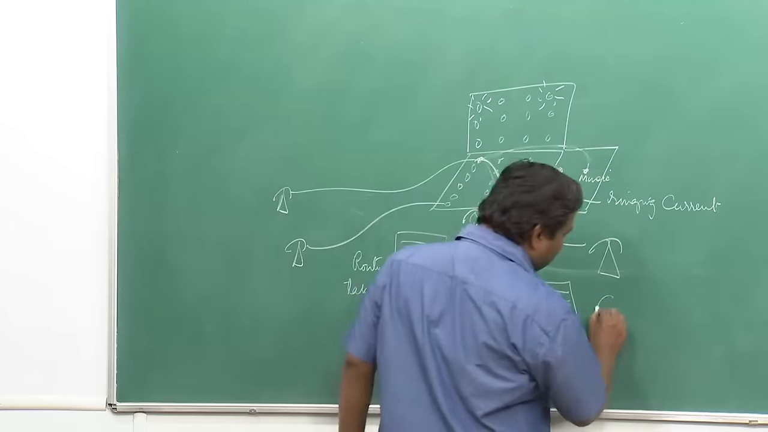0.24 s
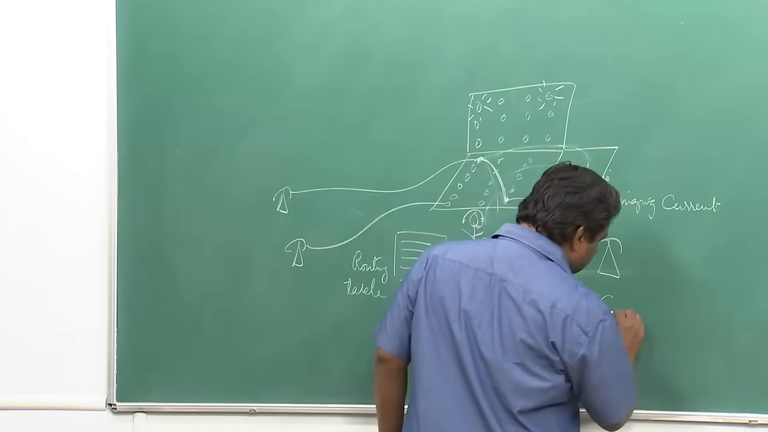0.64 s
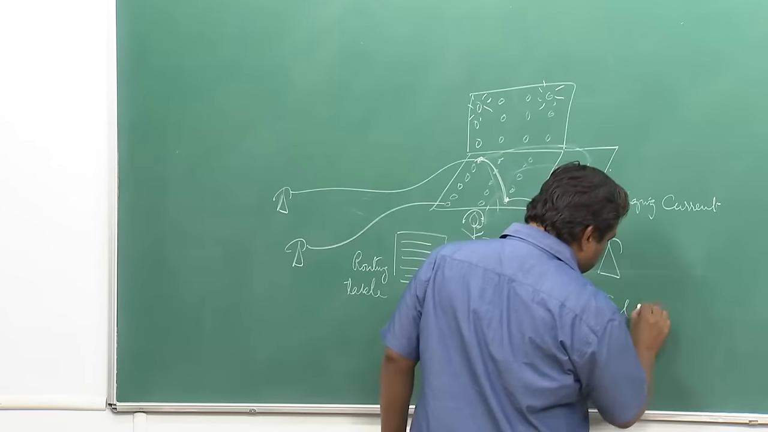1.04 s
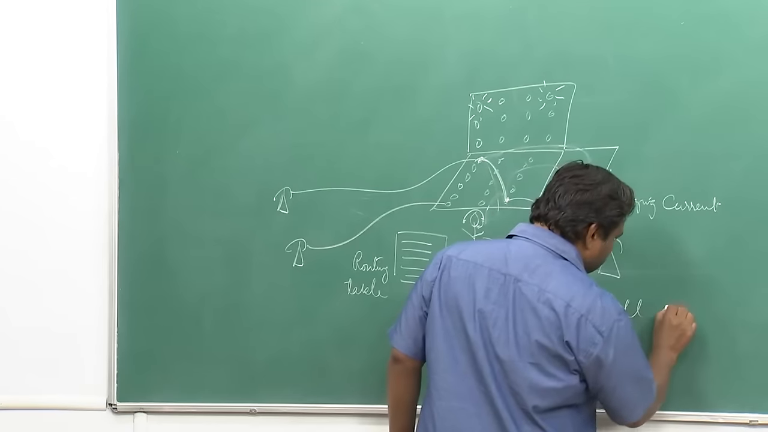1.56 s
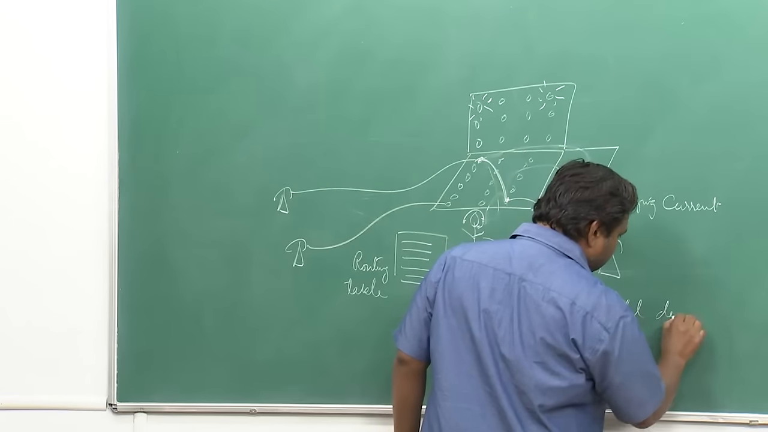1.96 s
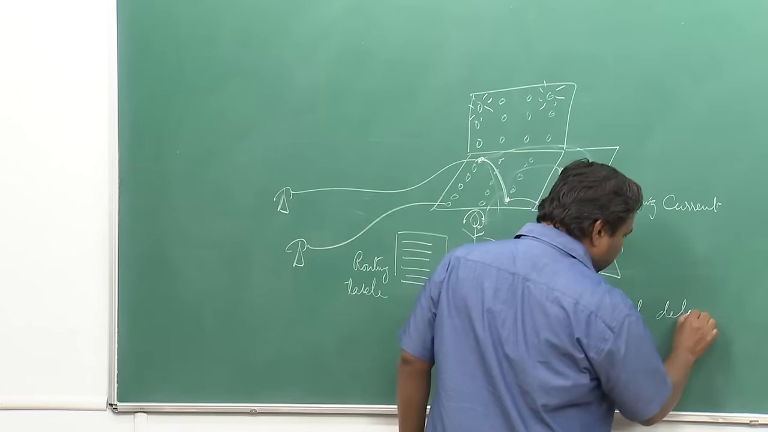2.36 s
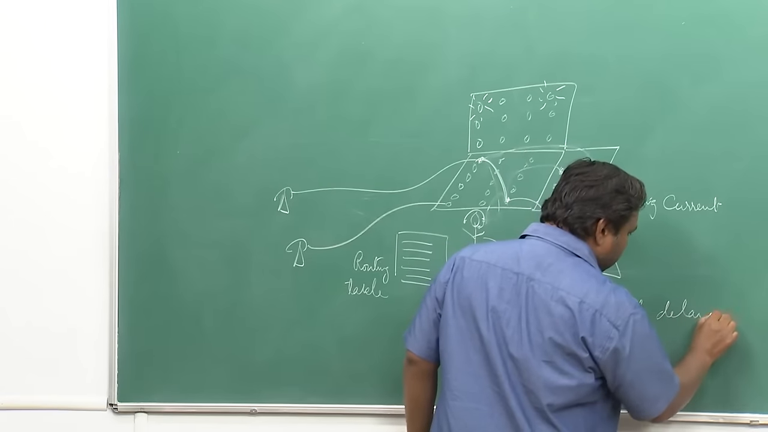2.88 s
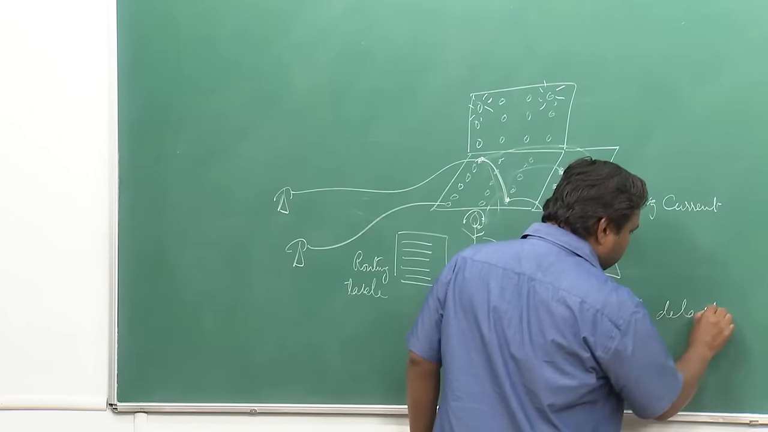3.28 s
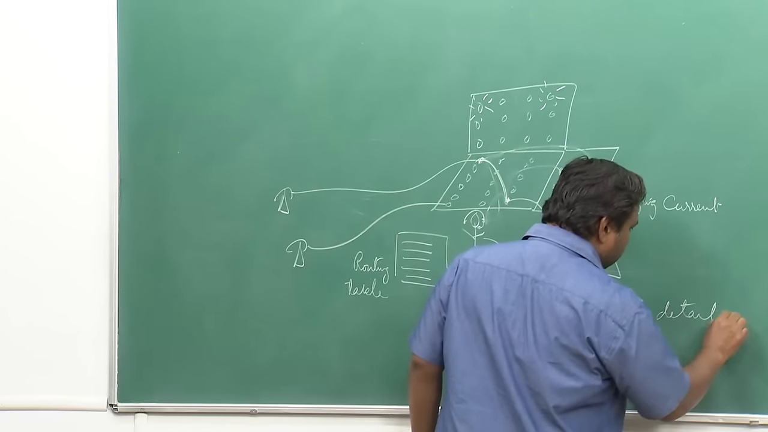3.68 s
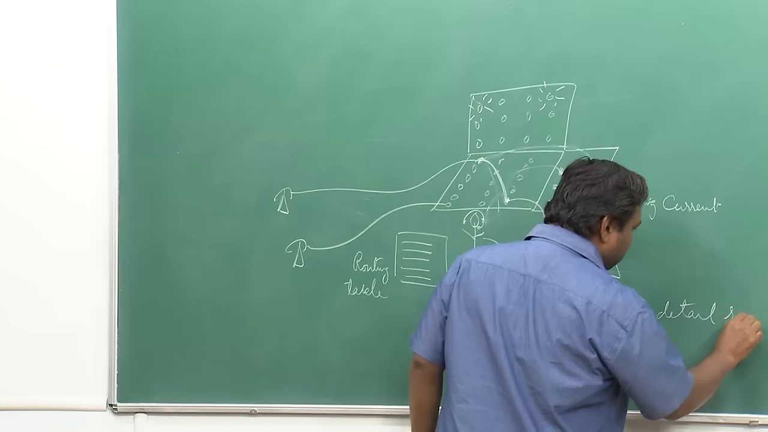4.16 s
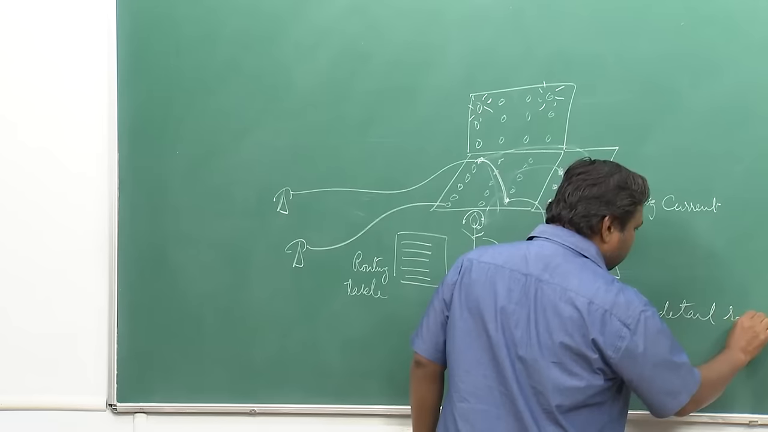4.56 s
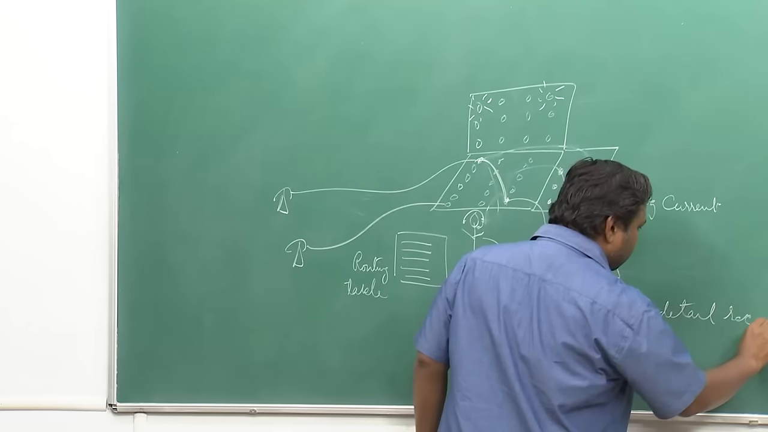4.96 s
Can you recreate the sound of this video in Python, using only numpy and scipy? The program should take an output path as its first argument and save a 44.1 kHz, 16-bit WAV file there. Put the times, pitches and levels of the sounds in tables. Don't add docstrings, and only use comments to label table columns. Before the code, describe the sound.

Quick gritty chalk strokes and hard little knocks on a chalkboard, close and dry, in a quiet room with a short tail.

```python
import sys
import numpy as np
from scipy import signal
from scipy.fft import rfft, irfft
from scipy.io import wavfile
from scipy.ndimage import uniform_filter1d

SR = 44100
rng = np.random.default_rng(int(sys.argv[2]) if len(sys.argv) > 2 else 0)


def amplitude_ratio(level_db):
    exponent = np.asarray(level_db, float) / 20
    return 10 ** exponent


def generate_wav(signal):
    frames = np.transpose(np.atleast_2d(signal))
    scaled = np.clip(frames, -1, 1) * 32767
    pcm = np.round(scaled).astype(np.int16)
    wavfile.write(sys.argv[1], SR, pcm)


N = 230422


def evened(x):
    return x / np.sqrt(np.mean(abs(x) ** 2) + 1e-20)


def read(points, hz):
    f, value = np.transpose(points)
    return np.interp(np.log(hz + 1), np.log(f + 1), value)


def add(mix, s, sound):
    part = mix[round(s * SR):][:len(sound)]
    part += sound[:len(part)]


def band(x, lo_hz, hi_hz, order=2):
    return signal.sosfilt(signal.butter(order, [lo_hz, hi_hz], "band", fs=SR, output="sos"), x)


def coloured(x, points):
    hz = np.fft.rfftfreq(x.shape[-1], 1 / SR)
    return irfft(rfft(x) * amplitude_ratio(read(points, hz)), x.shape[-1])


# frequency in Hz, width in Hz, level in dB.
BOARD_MODES = [(1670, 235, 13.2), (1920, 280, 1.1), (2393, 21, 1.1), (2680, 440, 1.4), (2950, 300, 2.2),
               (3290, 190, 1.5), (3575, 270, 1.3), (4030, 260, 0.98), (4740, 320, 2.2), (5435, 26, 0.56)]


def board_response(spot_db):
    t = np.arange(2048) / SR
    hz, width, db = np.transpose(BOARD_MODES)[:, :, None]
    strength = amplitude_ratio(db + spot_db[:, None]) * 2 * np.pi * width / SR
    modes = strength * np.exp(-np.pi * width * t) * np.cos(2 * np.pi * hz * t)
    return modes.sum(0) + (t == 0)


GRAINS_PER_S, GRAIN_SPREAD_DB, STUTTER_DB = 8000, 2.5, 2.2
MODE_SPREAD_DB, MODE_CUT_DB = 5, 2.5


def grit_clicks(size):
    grains = rng.choice([-1., 1.], size) * (rng.random(size) < GRAINS_PER_S / SR)
    grains *= amplitude_ratio(GRAIN_SPREAD_DB * np.minimum(rng.exponential(1, size), 4))
    stutter = evened(uniform_filter1d(rng.standard_normal(size), size=70))
    spot = board_response(MODE_SPREAD_DB * (2 * rng.random(len(BOARD_MODES)) - 1) - MODE_CUT_DB)
    return signal.oaconvolve(grains * amplitude_ratio(STUTTER_DB * stutter), spot)[2048:size]


RISE_BEND, FALL_BEND = 0.95, 1.49
POINTED = .5
LEAN_GROWTH_DB, RUB_GROWTH_DB = 9.5, 5
PRESS_DB, PRESS_PER_LEAN, PRESS_PER_SLOWING = 8.5, 0.44, 0.15
RUB_PER_SLOWING = 0.21
FULL_LEAN_DB = 4
OPENING_PRESS_DB, OPENING_S = 28, .16
RING_HZ, RING_HZ_PER_LEAN, RING_HZ_PER_SLOWING = 2540, 37.8, 6.3
RING_OCTAVES, RING_DB = 0.52, 13

# frequency in Hz, level in dB.
GRIT_COLOUR = [(150, -79), (250, -61), (366, -18.5), (637, -17.5), (1150, -7.5), (1510, -19.5),
               (2070, -9.5), (2880, -11.5), (3420, -12), (4590, -8.5), (5650, -1), (9670, -5.5),
               (10500, -11), (15700, -14)]
# time in seconds, lift in dB.
TIP_FIZZ = [
    (.1, 15),
    (.3, 42),
    (1.25, 31),
    (2.5, 17),
    (3.3, 12),
    (3.5, 18.5),
    (3.75, 7),
    (4.6, 4),
    (5.25, 11),
]


def stroke(start, fastest, end, top_db, lean_db, growth_db=LEAN_GROWTH_DB):
    grit = grit_clicks(round((end - start) * SR) + 2048)
    hz, t, z = signal.stft(grit, SR, nperseg=256, noverlap=192)
    t = t + start

    ramp = np.interp(t, [start, fastest, end], [0, 1, 0])
    arch = POINTED * ramp + (1 - POINTED) * np.sin(np.pi / 2 * ramp)
    slowing_db = -20 * np.log10(arch.clip(1e-2)) * np.where(t < fastest, RISE_BEND, FALL_BEND)
    progress = (t - fastest) / (end - start)
    lean = lean_db + growth_db * progress
    speed_db = top_db - slowing_db
    drag_db = lean + RUB_PER_SLOWING * slowing_db + RUB_GROWTH_DB * progress
    lean = np.minimum(lean, FULL_LEAN_DB)
    pressure_db = PRESS_DB + PRESS_PER_LEAN * lean + PRESS_PER_SLOWING * slowing_db
    pressure_db += OPENING_PRESS_DB * np.exp(-t / OPENING_S)

    ring_hz = RING_HZ - RING_HZ_PER_LEAN * lean - RING_HZ_PER_SLOWING * slowing_db
    hz = hz[:, None] + 1
    ring_bump_db = RING_DB * np.exp(-(np.log2(hz / ring_hz) / RING_OCTAVES) ** 2)
    colour = amplitude_ratio(read(GRIT_COLOUR, hz) + ring_bump_db)

    edges = 1 / (1 + (hz / np.array([1400, 4300])[:, None, None]) ** 10)
    shares = np.diff(edges, axis=0, prepend=0, append=1)
    levels_db = speed_db + np.array([drag_db, pressure_db, 0 * t])
    power = (shares * colour ** 2 * np.mean(abs(z) ** 2, 1, keepdims=True)).sum(1)
    gain = np.sqrt((shares * (amplitude_ratio(levels_db) ** 2 / power)[:, None]).sum(0))
    fizz_db = np.interp(t, *np.transpose(TIP_FIZZ))
    gain *= amplitude_ratio(fizz_db * np.clip(np.log2(hz / 10500) / 1.28, 0, 1))

    out = signal.istft(z * colour * gain, SR, nperseg=256, noverlap=192)[1][:len(grit)]
    return start, amplitude_ratio(-4) * out * signal.windows.tukey(len(out), min(1, 160 / len(out)))


# start, fastest moment and end in seconds, top speed as hiss in dB, lean as
# low rub in dB over the hiss.
STROKES = [(.15, 0.192, .26, -50, -22), (0.206, .25, .35, -57, -20), (0.299, 0.354, 0.46, -63.5, -3),
           (0.434, 0.46, .525, -58, -11), (0.536, 0.569, .625, -65, 0.5),
           (.645, 0.678, 0.82, -63.5, -13), (.735, .778, .86, -54, -8),
           (.872, 0.917, .98, -54.5, -21), (0.954, 0.98, 1.03, -60.5, -18),
           (1.0, 1.062, 1.12, -53.5, -6), (1.131, 1.182, 1.225, -55, -21),
           (1.398, 1.415, 1.5, -59.5, -12.5), (1.5, 1.582, 1.64, -56.5, -5),
                  (1.653, 1.71, 1.79, -55, -21.5), (1.873, 1.912, 2.02, -63, -16),
                  (1.949, 2.059, 2.115, -55.5, -4.5), (2.125, 2.18, 2.28, -53.5, -22),
                  (2.346, 2.378, 2.44, -60.5, -14.5), (2.42, 2.49, 2.54, -66.5, -4),
                  (2.554, 2.595, 2.65, -62, -21), (2.631, 2.706, 2.745, -63.5, 6),
                  (2.755, 2.79, 2.85, -62.5, -18), (2.82, 2.925, 2.995, -53, -8),
                  (3.002, 3.034, 3.08, -58.5, -22.5), (3.038, 3.105, 3.13, -53, -27.5),
           (3.459, 3.497, 3.52, -49, -17), (3.496, 3.5, 3.55, -62, -6), (3.746, 3.78, 3.88, -55.5, -7),
                (3.891, 3.899, 3.96, -56.5, -16), (3.927, 4.008, 4.055, -58.5, -24),
                (4.062, 4.112, 4.19, -54, 0), (4.185, 4.229, 4.275, -58, -14),
                (4.249, 4.346, 4.42, -56, -2.5), (4.436, 4.473, 4.515, -60.5, -10.5),
                (4.525, 4.555, 4.63, -67, 11), (4.572, 4.64, 4.76, -51, -17.5),
                (4.71, 4.788, 4.838, -52, -6), (4.853, 4.88, 4.965, -52, -17.5),
                (4.953, 5.004, 5.06, -61, 2), (5.054, 5.092, 5.17, -55, -15.5),
                (5.183, 5.196, 5.26, -61.5, 2)]
# start, fastest moment and end in seconds, hiss in dB, lean in dB.
HOOKS = [
    (1.18, 1.24, 1.275, -62, -3),
    (2.22, 2.307, 2.335, -61.5, 0),
    (3.1, 3.142, 3.172, -63, -2),
    (1.75, 1.82, 1.865, -65, -2.5),
]
HOOK_GROWTH_DB = 38
# start, fastest moment and end in seconds, hiss in dB,
# lean in dB, change of lean in dB.
OPENING_SKID = (.137, .155, .21, -60, -4, -30)


def handwriting():
    strokes = [stroke(*row) for row in STROKES]
    hooks = [stroke(*row, HOOK_GROWTH_DB) for row in HOOKS]
    return strokes + hooks + [stroke(*OPENING_SKID)]


THUD_DB_PER_KHZ = -10.5


def tap(s, peak_db, ring_hz, crack_db, t60):
    t = np.arange(3000) / SR
    click = (t == 0) * 1.
    thud_db = THUD_DB_PER_KHZ * ring_hz / 1000
    soft_edge = (1 - np.exp(-t / 0.0014)) ** 2
    ring = np.exp(-np.log(1000) * t / t60) * np.sin(2 * np.pi * ring_hz * t) * soft_edge
    knock = band(click, .62 * ring_hz, 1.6 * ring_hz, order=3)
    crack = band(click, 4200, 6500, order=3)
    tick = band(click, 7900, 21000)
    panel, deep_panel = band(click, 570, 1070), band(click, 79, 350)
    parts = [ring, knock, crack, tick, panel, deep_panel]
    levels_db = peak_db + np.array([-18, -3, crack_db + 3.5, -33, thud_db - 2.5, thud_db - 11])
    return s + 0.00043, sum(amplitude_ratio(db) * part / abs(part).max() for db, part in zip(levels_db, parts))


# time
# in seconds, peak in dB, ring in Hz, crack in dB relative to the peak, ring t60 in seconds.
TAPS = [(0.137, -27, 1350, -35, 0.011), (0.75, -32, 2880, -17, 0.011), (1.254, -38.5, 2100, -34, 0.012),
        (1.349, -18.5, 2010, -22, 0.016), (2.136, -35.5, 2930, -10.5, 0.016),
        (2.301, -46, 2090, -24, 0.0088), (2.353, -38, 2680, -10, 0.012), (3.016, -41, 3040, -6, 0.012),
        (3.146, -38, 1760, -13, 0.017), (3.245, -14.5, 2060, -18, 0.0052),
        (3.444, -19, 1980, -18.5, 0.021), (3.516, -33, 1600, -29, 0.025),
        (3.712, -21, 1960, -26, 0.017), (3.78, -32, 2700, -17, 0.011), (4.075, -47, 2280, -16, 0.012),
        (4.859, -37, 3500, -20, 0.012), (5.191, -34, 2140, -29, 0.011)]


def taps():
    return [tap(*row) for row in TAPS]


def shifting(x, responses, turns_per_s):
    turn = np.pi * turns_per_s * np.arange(N) / SR
    out = np.zeros(N)
    for k, response in enumerate(responses):
        fed = x * np.cos(turn + k * np.pi / 3)
        out += signal.fftconvolve(fed, response / np.linalg.norm(response))[:N]
    return out * np.sqrt(2 / 3)


ECHO_DRIFT, SCATTER_DB, SCATTER_T60 = 0.12, -8.5, 0.056
# delay in ms, level in dB.
ECHOES = [(.85, -2.5), (2.2, 2), (4.5, -1.5), (7.4, -5), (12.4, -7), (14.0, -5.5)]


def close_echoes(x):
    out, at = x.copy(), np.arange(N)
    for ms, db in ECHOES:
        sway = [np.sin(2 * np.pi * (f * at / SR + rng.random())) for f in np.geomspace(.3, 2.5, num=5)]
        delay_ms = ms * (1 + ECHO_DRIFT * sum(sway) / 2 / np.sqrt(ms))
        echo = np.interp(at - delay_ms * SR / 1000, at, x)
        out += amplitude_ratio(db) * signal.sosfilt(signal.butter(2, 9000 / ms ** 0.61, fs=SR, output="sos"), echo)
    t = np.arange(4096) / SR
    scatter = band(rng.standard_normal((3, 4096)), 1260, 6250) * amplitude_ratio(-60 * t / SCATTER_T60) * (t > .003)
    return out + amplitude_ratio(SCATTER_DB) * shifting(x, scatter, turns_per_s=3.01)


ROOM_DB = -12.5
# frequency in Hz, t60 in seconds.
ROOM_DECAY = [(300, 0.22), (1000, 0.27), (2300, 0.35), (4500, 0.4), (7000, 0.16), (12000, 0.33)]


def classroom(x):
    reflections = np.zeros((3, SR // 2))
    at = np.arange(700, SR // 2 - 20, 16) + rng.integers(0, 16, (3, (SR // 2 - 705) // 16))
    np.put_along_axis(reflections, at, rng.choice([-1., 1.], at.shape), 1)
    hz, t, z = signal.stft(reflections, SR, nperseg=256)
    decay = amplitude_ratio(-60 * t / read(ROOM_DECAY, hz)[:, None])
    tails = signal.istft(z * decay, SR, nperseg=256)[1]
    return shifting(x, band(tails, 740, 6500), turns_per_s=1.25)


AIR_DB = -57.5
# frequency in Hz, level in dB per Hz.
AIR_COLOUR = [(15, -32), (25, -4), (99, -1.5), (141, -5.5), (185, -13.5), (451, -14.5), (531, -15),
              (575, -14), (714, -12), (1440, -16), (1940, -17), (7920, -29.5), (10700, -31.5), (14400, -29),
              (16000, -91)]
# frequency in Hz, width in Hz, rms level in dB.
HUM = [(50.6, 6.5, -111), (86.8, 3.6, -71), (120, 7.6, -100), (195.4, 3.9, -79)]


def air():
    out = amplitude_ratio(AIR_DB - 10.0) * evened(coloured(rng.standard_normal(N), AIR_COLOUR))
    for hz, width, db in HUM:
        hum = band(rng.standard_normal(N), hz - width / 2, hz + width / 2, order=1)
        out += amplitude_ratio(db) * evened(hum)
    return out


def scene():
    chalk = np.zeros(N)
    for s, sound in handwriting() + taps():
        add(chalk, s, sound)
    near = close_echoes(chalk)
    return np.tile(near + amplitude_ratio(ROOM_DB) * classroom(chalk) + air(), (2, 1))


# from Hz, to Hz, threshold in dB per bin.
GATES = [(14350, 15150, -107), (15150, 16500, -96)]


def gated(x):
    hz, t, z = signal.stft(x, SR, nperseg=2048)
    keep = np.ones(z.shape[1:])
    for lo_hz, hi_hz, least_db in GATES:
        inside = (hz >= lo_hz) & (hz < hi_hz)
        keep[inside] = np.mean(abs(z[:, inside].mean(0)) ** 2, 0) > amplitude_ratio(least_db) ** 2
    return signal.istft(z * keep, SR, nperseg=2048)[1][:, :N]


def band_limit(x):
    return signal.sosfilt(signal.butter(12, 16370, fs=SR, output="sos"), x)


BALANCE_DB, APART_DB = 1.6, -16
LOW_EDGE_HZ, TOP_EDGE_HZ = 42, 15780


def record(dry):
    apart = amplitude_ratio(APART_DB) * np.roll(band(dry[0], 13000, 20000), 37)
    wired = dry * amplitude_ratio([[BALANCE_DB / 2], [-BALANCE_DB / 2]]) + np.array([apart, -apart])
    wired = signal.sosfilt(signal.butter(6, LOW_EDGE_HZ, "high", fs=SR, output="sos"), wired)
    top_edge = signal.firwin(511, TOP_EDGE_HZ, window=("kaiser", 9), fs=SR)
    wired = signal.oaconvolve(wired, top_edge[None], "same")
    mix = gated(wired)
    return band_limit(mix)


dry = scene()
out = record(dry)
generate_wav(out)
```